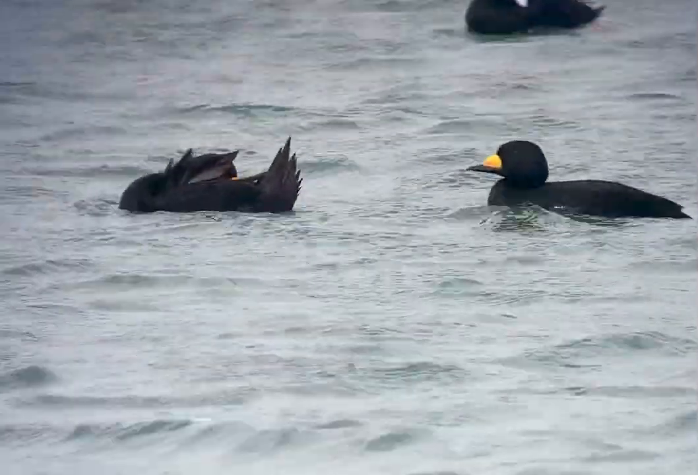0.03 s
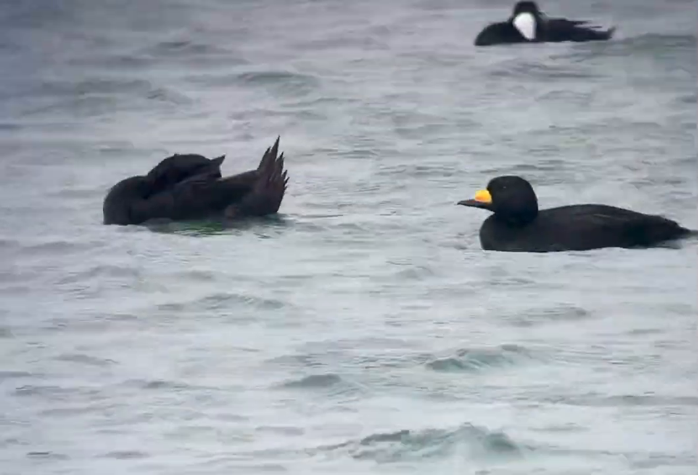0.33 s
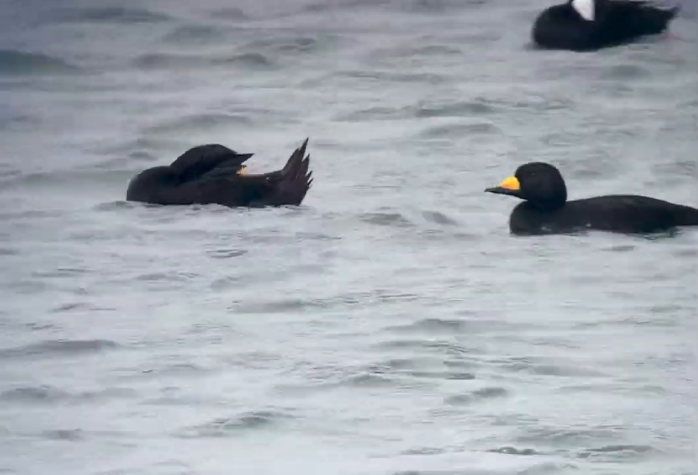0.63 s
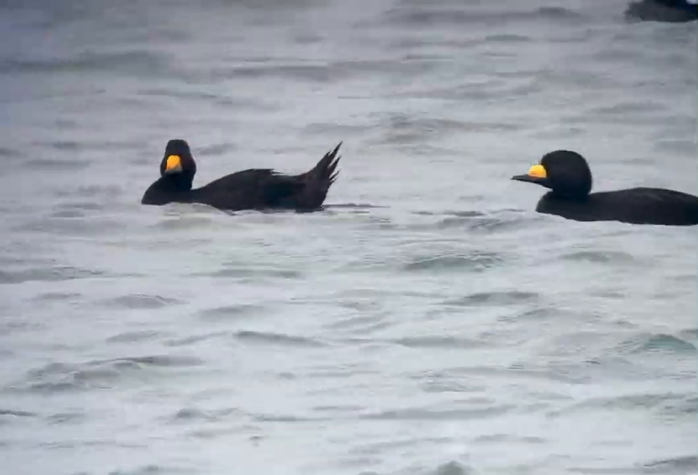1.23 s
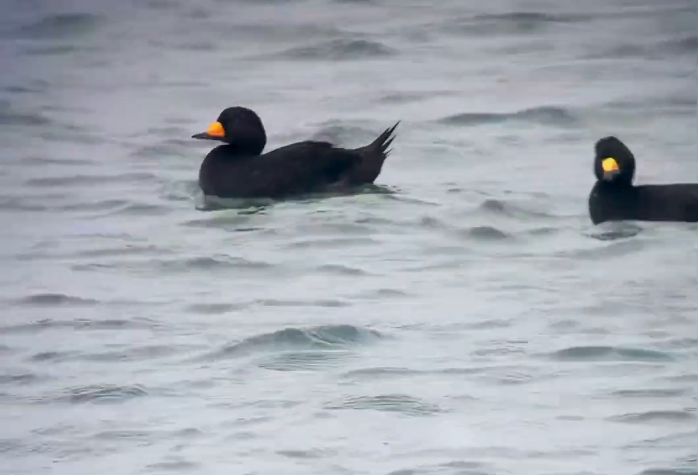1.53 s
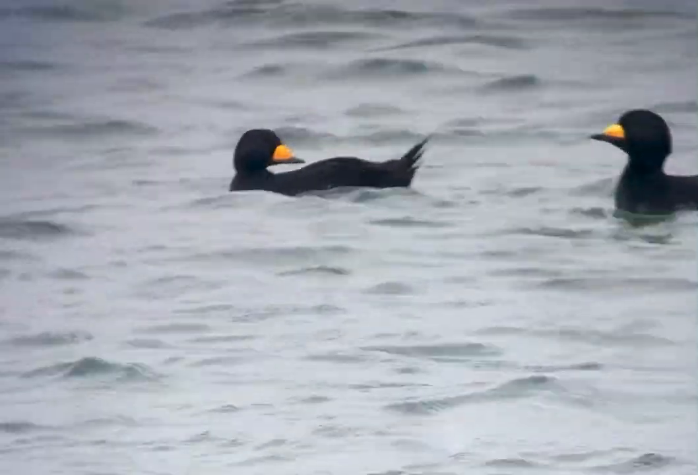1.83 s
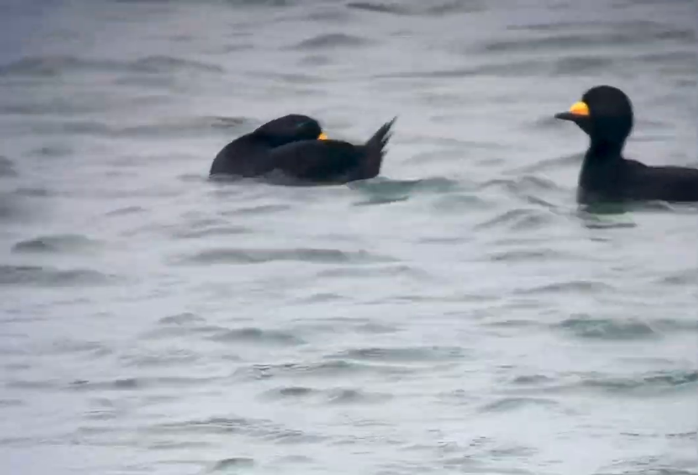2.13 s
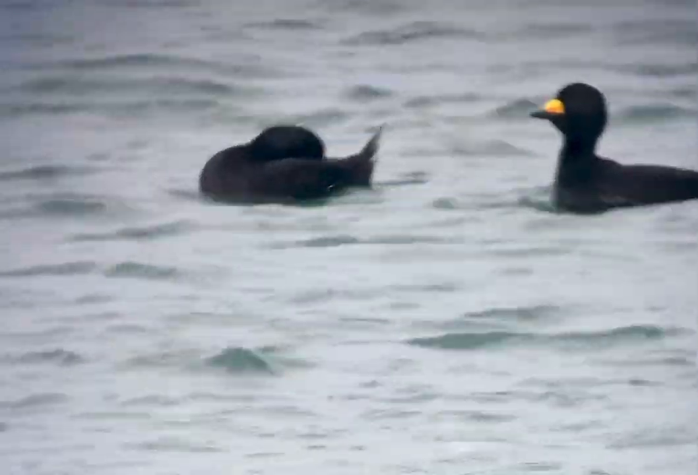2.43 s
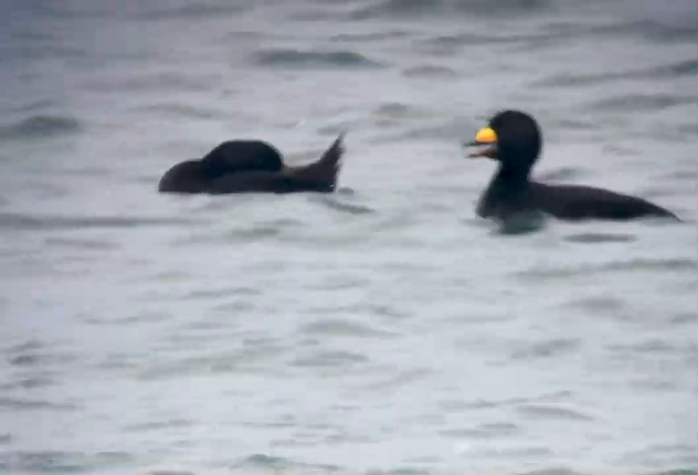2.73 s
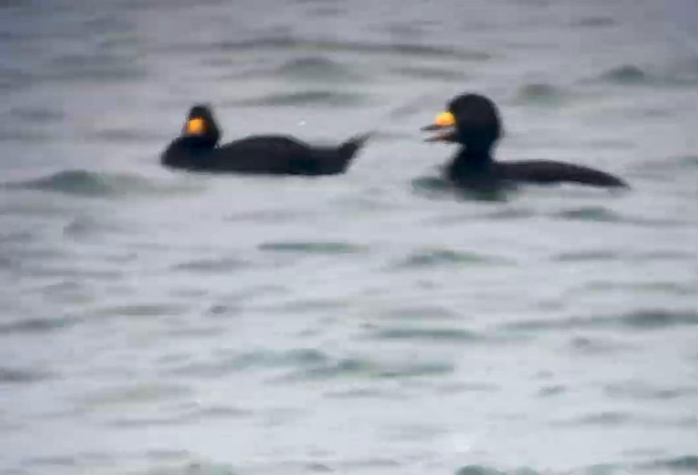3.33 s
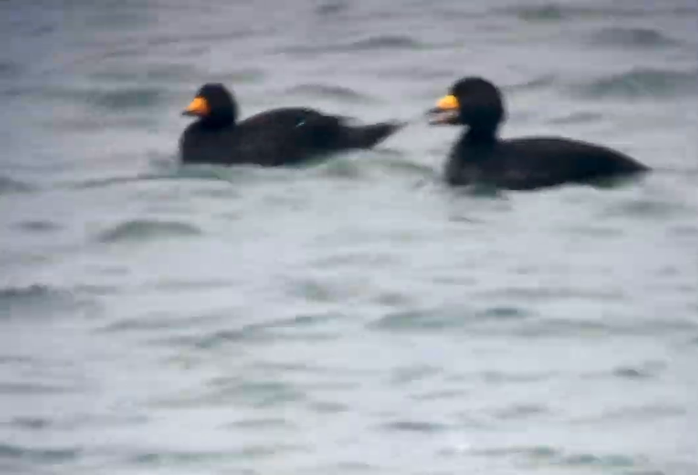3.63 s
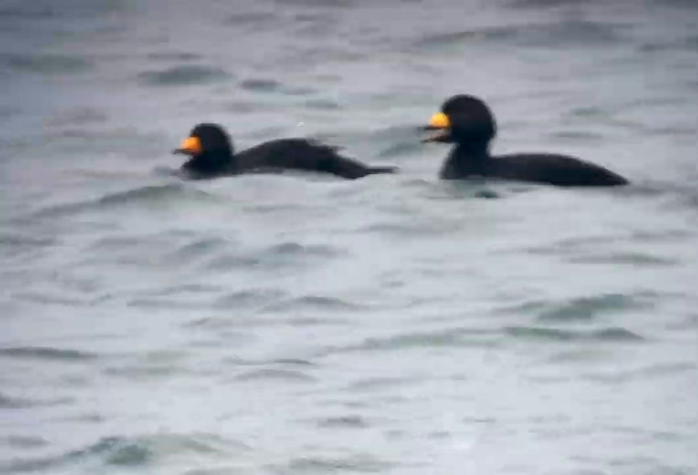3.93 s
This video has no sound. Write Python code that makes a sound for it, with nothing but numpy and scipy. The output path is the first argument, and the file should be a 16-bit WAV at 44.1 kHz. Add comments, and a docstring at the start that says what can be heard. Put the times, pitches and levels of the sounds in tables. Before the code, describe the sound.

Gusts of wind buffet an exposed microphone beside a harbour, while water laps and drips close by and far birds chirp faintly. Near the end the wind drops and a sea duck whistles once, thin and sagging.

```python
"""A harbour, with the microphone out in the wind. From the start gusts rumble and flutter on it,
water laps and drips close by over a soft wash, and a far bird repeats an arched chirp about three
times a second, with a few peeps from others. A wavelet fizzes near 0.7 s; the hardest buffets hit
from 0.9 to 2 s. At 2.9 s a sea duck gives one long, thin whistle that sags as the wind eases."""
import sys
import numpy as np
from scipy import signal
from scipy.fft import rfft, irfft
from scipy.io import wavfile
from scipy.ndimage import uniform_filter1d

SR = 44100
rng = np.random.default_rng(int(sys.argv[2]) if len(sys.argv) > 2 else 0)


def master_out(mix):
    """Clip the mix to full scale and print it as 16-bit PCM to the path in sys.argv[1]."""
    frames = np.transpose(np.atleast_2d(mix))
    ceiling = np.clip(frames, -1, 1)
    pcm = np.round(ceiling * 32767).astype(np.int16)
    wavfile.write(sys.argv[1], SR, pcm)


N = 176400


def amp(db):
    return 10 ** (np.asarray(db) / 20)


def unit(x):
    return x / np.sqrt(np.mean(x ** 2) + 1e-20)


def steady(x, size):
    """Holds the rms near 1 over a number of samples."""
    power = uniform_filter1d((x ** 2).mean(0), size)
    return x / np.sqrt(abs(uniform_filter1d(power, size // 2)) + 1e-20)


def along(points, t):
    """Reads a curve in time."""
    return np.interp(t, *np.transpose(points))


def across(points, hz):
    """Reads a spectrum on a log-frequency axis."""
    f, value = np.transpose(points)
    return np.interp(np.log(hz + 1), np.log(f + 1), value)


def colour(x, points):
    """Filters x by a spectrum."""
    hz = np.fft.rfftfreq(x.shape[-1], 1 / SR)
    return irfft(rfft(x) * amp(across(points, hz)), x.shape[-1])


def drift(rate_hz):
    """Smooth random motion of rms 1, up to about the given rate."""
    rolloff = np.exp(-(np.fft.rfftfreq(N, 1 / SR) / rate_hz) ** 2)
    return unit(irfft(rfft(rng.standard_normal(N)) * rolloff, N))


def stereo_noise(likeness, size):
    """Left and right noise with a likeness from 0 to 1."""
    shared = np.sqrt(likeness) * rng.standard_normal(size)
    return shared + np.sqrt(1 - likeness) * rng.standard_normal((2, size))


def pan(left_db):
    return amp(np.array([[.5], [-.5]]) * left_db)


def add(mix, start, sound):
    part = mix[:, max(round(start * SR), 0):][:, :sound.shape[-1]]
    part += sound[..., :part.shape[1]]


def harbour(x, echo_db, t60_s=.4):
    """Adds the diffuse echo that reaches the microphone from the water and the shore."""
    t = np.arange(SR) / SR
    tail = rng.standard_normal((2, SR)) * amp(-60 * t / t60_s)
    echo = signal.fftconvolve(x, tail / np.linalg.norm(tail[0]), axes=1)[:, :N]
    return x + amp(echo_db) * echo


# Tone of the far water. Each row: frequency in Hz, relative level in dB.
WASH_SPECTRUM = [(100, 2.5), (220, -10), (290, 6.5), (420, -9), (650, -12.5), (1300, -17), (2000, -17.5),
                 (2850, -21), (3500, -33.5), (5500, -44.5), (9000, -58), (11000, -42.5), (13500, -73)]
# Its lean at the microphone. Each row: frequency in Hz, left minus right in dB.
WASH_LEAN = [(200, -2.5), (700, 5), (1300, 0), (2400, 9), (4400, -2.5), (8000, -0.5)]
# Its stereo width. Each row: frequency in Hz, left-right likeness from 0 to 1.
WASH_LIKENESS = [(250, 0.88), (640, 0.014), (3000, 0.017), (12000, 0.11)]

def wash(level_db=-46.5):
    """Countless ripples far out in the harbour merge into a gently flickering hiss."""
    hz = np.fft.rfftfreq(N, 1 / SR)
    left, independent = rfft(rng.standard_normal((2, N)) * amp(1.9 * drift(23)))
    likeness = across(WASH_LIKENESS, hz)
    right = likeness * left + np.sqrt(1 - likeness ** 2) * independent
    gain = amp(across(WASH_SPECTRUM, hz)) * pan(across(WASH_LEAN, hz))
    return unit(irfft(np.array([left, right]) * gain, N)) * amp(level_db)


# Tone of the foam. Each row: frequency in Hz, relative level in dB.
FOAM_SPECTRUM = [(3000, -18), (4800, 0), (7000, -34)]

def foam(middle_s=.73, half_width_s=.12, level_db=-77):
    """A wavelet breaks and fizzes: a grainy hiss, faint at the microphone."""
    grains = rng.standard_normal(N) * amp(6.7 * drift(150))
    swell = np.exp(-((np.arange(N) / SR - middle_s) / half_width_s) ** 2)
    return amp(level_db) * unit(colour(grains, FOAM_SPECTRUM)) * swell


# Odd birds in the distance. Each row: start in seconds, length in seconds, pitch in Hz,
# waver as a share of pitch, level in dB.
PEEP_NOTES = [(0.27, 0.12, 4920, 0.0073, -73), (0.864, 0.1, 2750, 0.038, -67.5),
              (1.415, 0.13, 1176, 0.013, -60.5), (2.662, 0.11, 3290, 0.013, -67.5)]

def peeps(waver):
    """Thin notes, each wavering around one pitch."""
    out = np.zeros((2, N))
    for start, length, pitch_hz, share, db in PEEP_NOTES:
        hz = pitch_hz * (1 + share * waver[:int(length * SR)])
        tone = np.sin(2 * np.pi * np.cumsum(hz) / SR)
        add(out, start, amp(db) * signal.windows.hann(len(hz)) * tone)
    return out


# One bird across the harbour. Each entry: level of the next chirp in dB.
CHIRP_LEVELS = [-64, -67.5, -72.5, -66, -67.5, -63.5, -69, -60.5, -59.5, -64.5, -66.5, -68, -68]
FIRST_TOP_S, CHIRP_EVERY_S, CHIRP_RISE_S, CHIRP_FALL_S = .122, .3171, .07, .054
CHIRP_TOP_HZ, CHIRP_SAG_HZ_PER_S, CHIRP_ARCH_HZ = 3197, 27, 750

def chirps(waver, swell_db_per_s=35, flicker_db=3.5, lower_octave_db=-12):
    """Evenly spaced chirps rise and fall in pitch, with a weak partial an octave below."""
    out, flicker = np.zeros((2, N)), drift(53)
    t = np.arange(-CHIRP_RISE_S, CHIRP_FALL_S, 1 / SR)
    drop = (t / np.where(t < 0, CHIRP_RISE_S, CHIRP_FALL_S)) ** 2  # 0 at the top, 1 at the ends
    swell = signal.windows.tukey(len(t), .2) * amp(swell_db_per_s * t)
    for k, db in enumerate(CHIRP_LEVELS):
        top_s = FIRST_TOP_S + k * CHIRP_EVERY_S
        here = np.clip(((top_s + t) * SR).astype(int), 0, N - 1)
        hz = CHIRP_TOP_HZ - CHIRP_SAG_HZ_PER_S * top_s - CHIRP_ARCH_HZ * drop
        hz *= 1 + (.009 + .045 * drop) * waver[here]  # steadiest at the top
        phase = 2 * np.pi * np.cumsum(hz) / SR
        tone = np.sin(phase) + amp(lower_octave_db) * np.sin(phase / 2)
        add(out, top_s - CHIRP_RISE_S, amp(db + flicker_db * flicker[here]) * swell * tone)
    return out


def far_birds():
    """Chirps and peeps carry over the water from far left of the microphone."""
    waver = drift(rate_hz=250)
    return harbour((chirps(waver) + peeps(waver)) * pan(left_db=6), echo_db=-9)


# Water close by. Each row: start in seconds, decay in seconds, level in dB, tilt in dB per octave.
LAPS_AND_DRIPS = [(0.031, 0.0014, -27, -12.5), (0.622, 0.014, -65, 1), (1.607, 0.0025, -60, 2),
                  (1.078, 0.0024, -35, 0.5), (1.08, 0.0071, -62, 23), (1.954, 0.041, -63, 7.5),
                  (2.84, 0.021, -61, -3), (3.116, 0.0054, -56, -4), (3.354, 0.014, -54.5, -6.5),
                  (3.368, 0.0022, -45.5, -4), (3.762, 0.0083, -65, 5), (3.5, 0.011, -60.5, 2.5)]
# Tone of the spray before tilting. Each row: frequency in Hz, relative level in dB.
SPRAY_SPECTRUM = [(500, -23.5), (1500, -1), (3300, 6), (5500, -4.5), (8500, -11.5), (11000, -10),
                  (14000, -33.5)]

def splashes():
    """Near the microphone, dead centre, water breaks in grainy bursts of spray and sharp drips."""
    out, t = np.zeros((2, N)), np.arange(SR // 2) / SR
    for start, decay, db, tilt_db in LAPS_AND_DRIPS:
        spray = stereo_noise(1, len(t)) * amp(6.4 * rng.standard_normal(len(t)))
        spectrum = [(hz, level + tilt_db * np.log2(hz / 3000)) for hz, level in SPRAY_SPECTRUM]
        envelope = (1 - np.exp(-4 * t / decay)) * np.exp(-t / decay)
        add(out, start, unit(colour(spray, spectrum)) * envelope * amp(db))
    return harbour(out, echo_db=-9)


# Gusts on the microphone. Each row: middle and length in seconds, rumble and flutter in relative dB.
MIC_GUSTS = [(-0.013, 0.2, -16.5, -27.5), (0.248, .08, -19.5, -38), (0.421, .12, -24, -41.5),
             (0.598, 0.052, -25, -46.5), (0.909, 0.081, -23, -45.5), (1.147, 0.1, -22, -33),
             (1.358, 0.11, -23.5, -40), (1.549, 0.058, -16.5, -26), (1.78, .15, -18, -32),
             (2.078, 0.22, -18.5, -29), (2.27, 0.076, -19, -33.5), (2.488, 0.082, -25.5, -33),
             (2.675, 0.057, -22, -49), (2.789, 0.032, -20, -35), (2.894, 0.045, -15.5, -32),
             (3.04, 0.16, -26, -35), (3.23, 0.033, -31, -48), (3.565, 0.084, -23.5, -60)]
# The breeze rumbling between them. Each row: time in seconds, relative level in dB.
BREEZE = [(0, -18), (.55, -34), (.72, -42), (1, -31), (2.7, -27), (3.35, -42), (4, -43)]
# Tone of the large and of the small eddies. Each row: frequency in Hz, relative level in dB.
RUMBLE_SPECTRUM = [(20, -27.5), (33, -23), (47, 0.5), (105, -2), (170, -7.5), (260, -19), (450, -37.5),
                   (1400, -88.5)]
FLUTTER_SPECTRUM = [(60, -21.5), (140, 5.5), (260, 5), (470, -3.5), (700, -19), (1100, -33.5), (1800, -49),
                    (3500, -61), (7000, -90.5)]

def wind(rumble_gain_db=-1, flutter_gain_db=7, likeness=.8):
    """Gusts swell and drop right on the microphone; large eddies rumble, small ones flutter in puffs."""
    t = np.arange(N) / SR
    rumble_power, flutter_power = amp(along(BREEZE, t)) ** 2, np.zeros(N)
    for middle, length, rumble_db, flutter_db in MIC_GUSTS:
        swell = .5 ** (abs(2 * (t - middle) / length) ** 3.33)
        rumble_power += swell * amp(rumble_db) ** 2
        flutter_power += swell * amp(flutter_db) ** 2
    eddies = stereo_noise(likeness, N)
    puffs = stereo_noise(likeness, N) * amp(10.8 * drift(58))
    rumble = steady(colour(eddies, RUMBLE_SPECTRUM), size=2200) * np.sqrt(rumble_power)
    flutter = steady(colour(puffs, FLUTTER_SPECTRUM), size=2600) * np.sqrt(flutter_power)
    return amp(rumble_gain_db) * rumble + amp(flutter_gain_db) * flutter * pan(left_db=.5)


# The sharpest eddies on the microphone. Each row: time in seconds, half width in milliseconds,
# peak in dB ahead of the low cut.
SHARP_EDDIES = [(.033, 0.86, -21), (0.107, 0.75, -32), (.912, 1.44, -9.5), (.921, 1.8, -8),
                (1.1, 1.68, -12), (1.122, 1.13, -13.5), (1.148, 1.2, -22), (1.244, 1.36, -11),
                (1.294, 1.36, -14.5), (1.488, 1.4, -21), (1.537, 1.12, -10), (1.552, 1.43, -6),
                (1.737, 1.08, -16.5), (1.826, 0.99, -14.5), (1.931, 1.53, -10), (1.952, 1.25, -3),
                (1.992, 0.69, -22.5), (2.019, 0.85, -13.5), (2.05, .55, -20.5), (2.063, 0.57, -19.5),
                (2.134, 0.7, -20.5), (2.198, 0.65, -24), (2.286, 0.58, -22), (2.383, 1.76, -14),
                (2.438, 1.08, -15), (2.449, 0.84, -15.5), (2.876, 0.68, -32), (3.031, 1.35, -18)]

def buffets(eddy_order=2.5, low_cut_hz=170):
    """A small vortex passes the microphone: a push and a pull, brighter when narrow."""
    out, t = np.zeros((2, N)), np.arange(-SR // 20, SR // 20) / SR
    for time, half_width_ms, db in SHARP_EDDIES:
        passage = t * 1000 / half_width_ms
        pressure = (1 / (1 + 1j * passage) ** eddy_order).real
        add(out, time + t[0], amp(db) * pressure)
    low_cut = signal.butter(2, low_cut_hz, "high", fs=SR, output="sos")
    return signal.sosfilt(low_cut, out) * pan(left_db=3)


# The duck's slight lift and long sag. Each row: time in seconds, pitch in Hz.
DUCK_PITCH = [(2.91, 1713), (2.98, 1745), (3.07, 1735), (3.24, 1718), (3.46, 1682), (3.58, 1653),
              (3.65, 1587)]
# Its strength at the microphone. Each row: time in seconds, level in dB.
DUCK_LEVEL = [(2.904, -53.5), (2.922, -56), (3.1, -58.5), (3.24, -55), (3.52, -63), (3.57, -60.5),
              (3.649, -64.5)]

def duck(waver_share=.0019, waver_hz=50.3, flicker_db=1.4):
    """Out on the harbour, just left of centre, a sea duck gives one nearly pure, wavering whistle."""
    t = np.arange(N) / SR
    hz = along(DUCK_PITCH, t) * (1 + waver_share * drift(waver_hz))
    calling = (t > DUCK_LEVEL[0][0]) & (t < DUCK_LEVEL[-1][0])
    level = amp(along(DUCK_LEVEL, t) + flicker_db * drift(40)) * calling
    tone = np.sqrt(2) * level * np.sin(2 * np.pi * np.cumsum(hz) / SR)
    return harbour(tone * pan(left_db=2), echo_db=-16)


def scene():
    return duck() + far_birds() + wind() + buffets() + wash() + splashes() + foam()


def record(dry):
    """The recorder cuts the treble above 15.7 kHz."""
    low_pass = signal.firwin(511, 15700, window=("kaiser", 9), fs=SR)
    return signal.oaconvolve(dry, low_pass[None], "same")


dry = scene()
out = record(dry)
master_out(out)
```